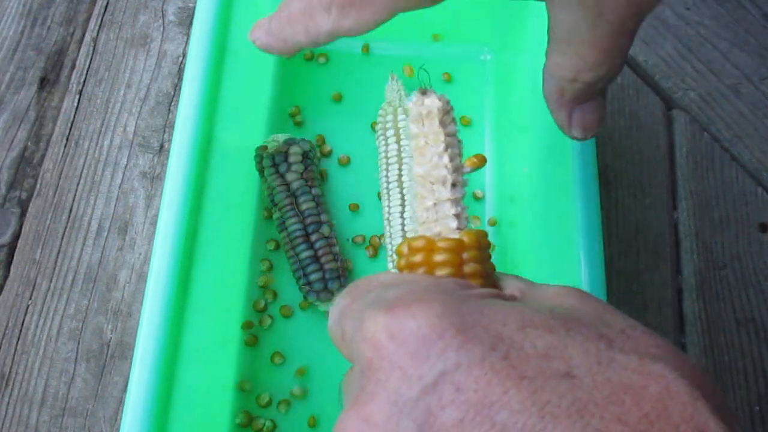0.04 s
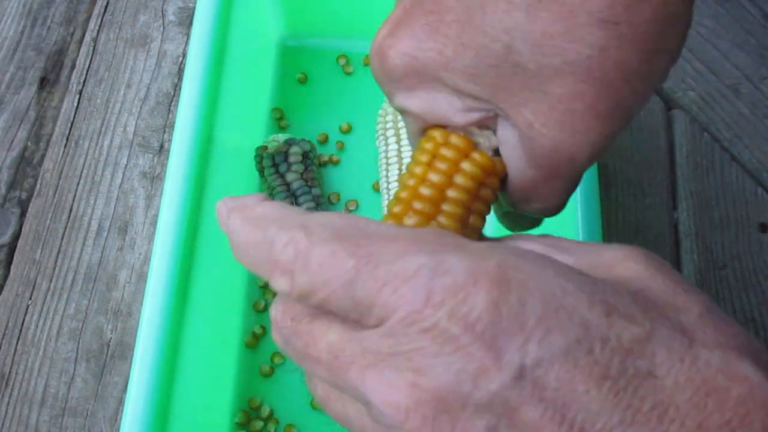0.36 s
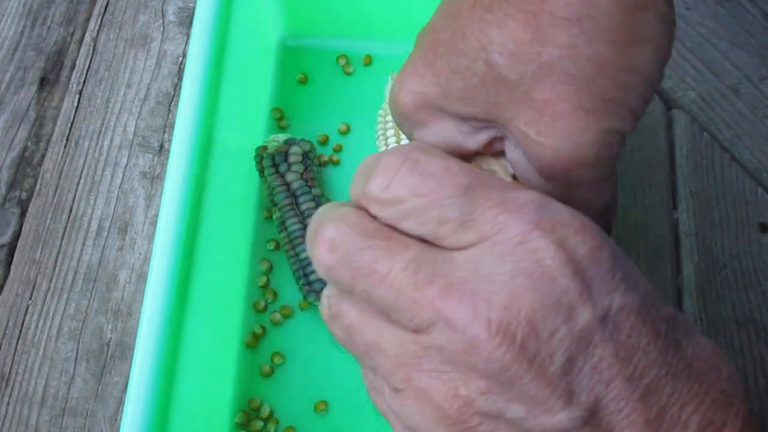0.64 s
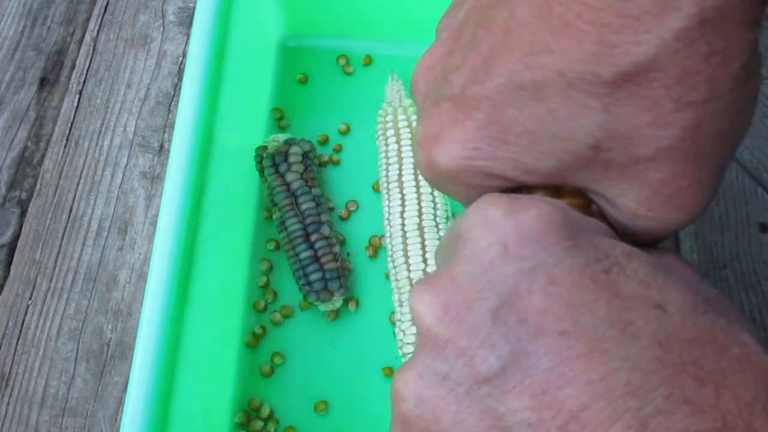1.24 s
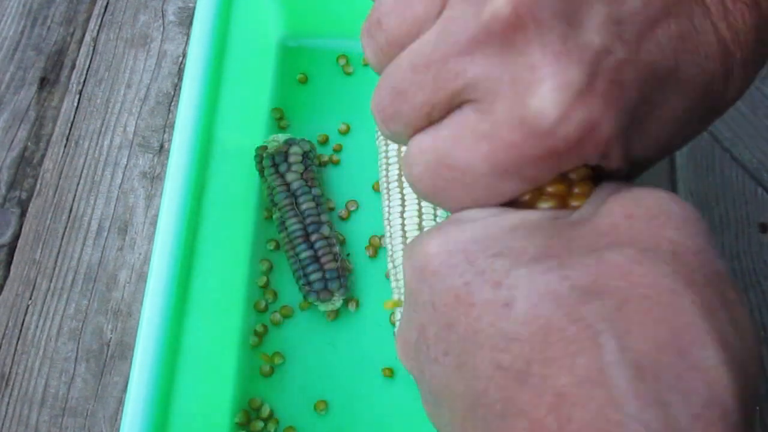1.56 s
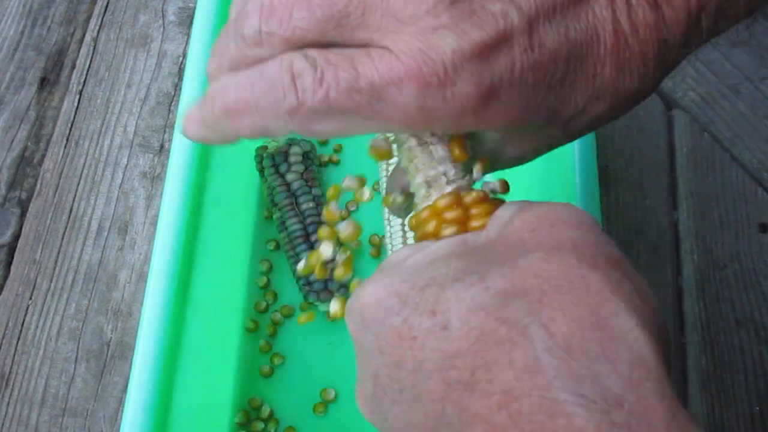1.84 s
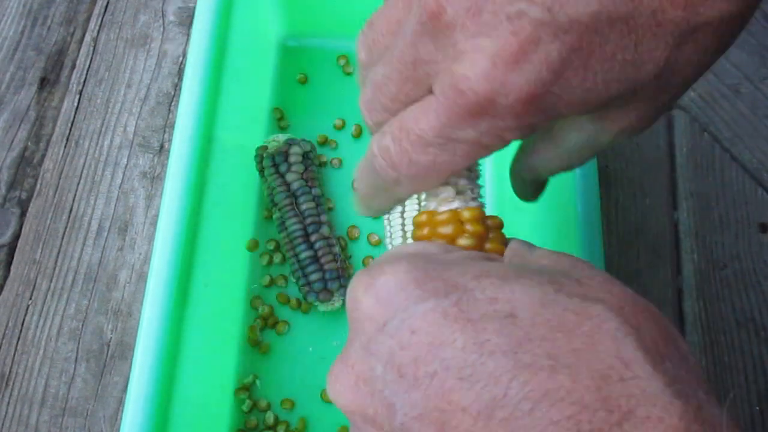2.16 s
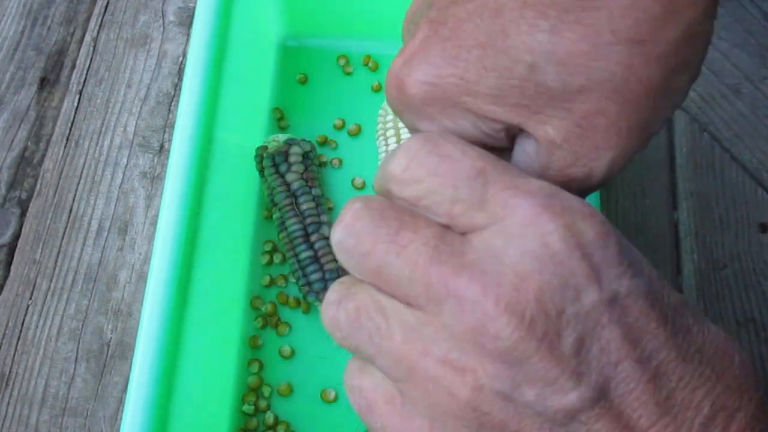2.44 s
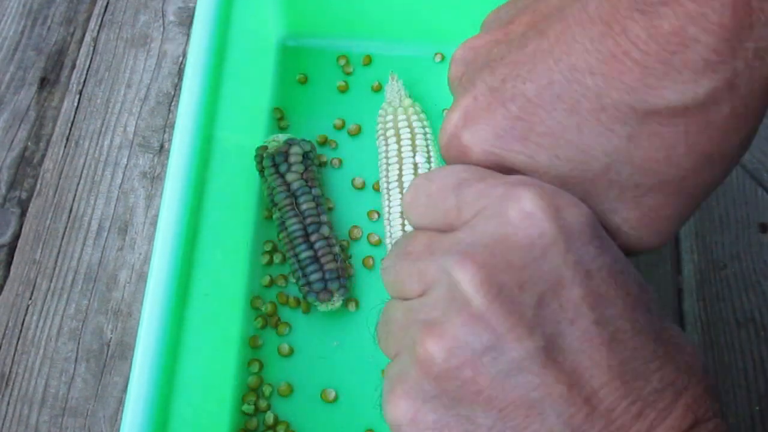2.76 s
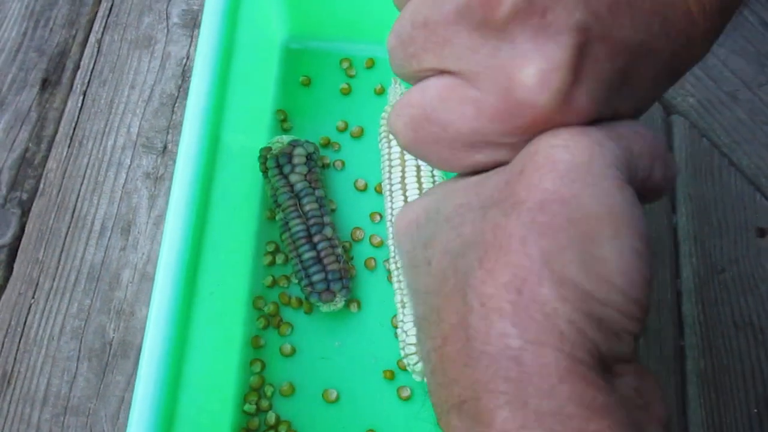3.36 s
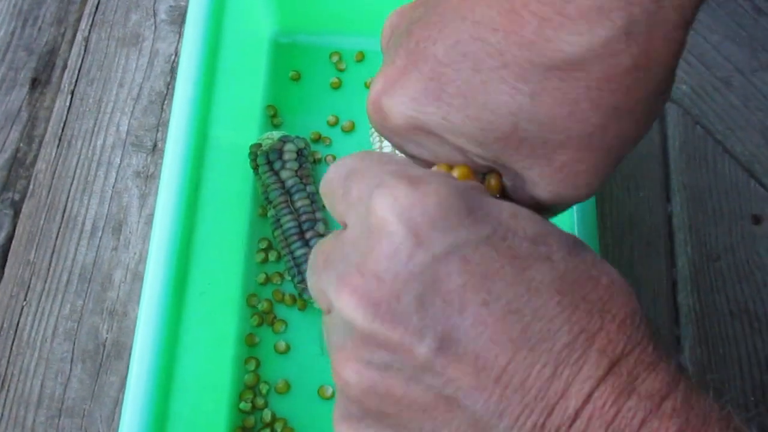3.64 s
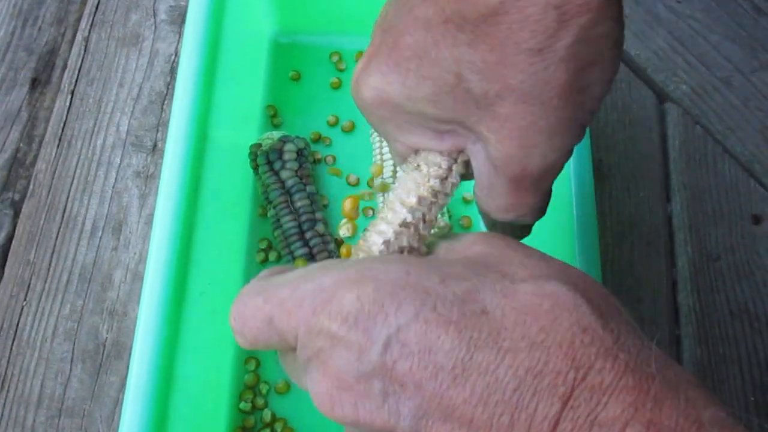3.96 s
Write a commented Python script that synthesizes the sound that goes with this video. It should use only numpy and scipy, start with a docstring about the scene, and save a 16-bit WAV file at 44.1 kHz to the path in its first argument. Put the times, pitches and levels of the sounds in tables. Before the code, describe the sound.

Dry corn kernels crackle and snap as hands twist them off a cob over a plastic tray. The close cracks come in three clusters, with small ticks and grinding between, over a faint distant outdoor rumble.

```python
"""Outdoors, above a plastic tray, hands twist dry kernels off a corn cob, heard from close by. Each kernel
snaps loose with a bright crack, a short woody ring and a low knock that the tray answers; late snaps also ring
the hollow cob. Between snaps, kernels tick and grind, skin slides and the grip bumps. A distant rush and rumble
go on behind."""
import sys
import numpy as np
from scipy import signal
from scipy.fft import rfft, irfft, next_fast_len
from scipy.io import wavfile
from scipy.ndimage import map_coordinates

SR = 44100
rng = np.random.default_rng(int(sys.argv[2]) if len(sys.argv) > 2 else 0)


def digitize_waveform(pressure):
    """Quantize a signal to 16-bit integers and store it at the path in sys.argv[1].

    Rows of a 2-D input are taken as channels; values are limited to [-1, 1].
    """
    field = np.atleast_2d(pressure).T
    bounded = np.clip(field, -1, 1)
    quanta = np.round(bounded * 32767).astype(np.int16)
    wavfile.write(sys.argv[1], SR, quanta)


N = 4 * SR
FRACTURE_T60_S = 0.00099  # sharp first instant of a contact


def amp(db):
    return 10 ** (np.asarray(db) / 20)


def unit_rms(x):
    return x / np.sqrt(np.mean(x ** 2) + 1e-20)


def curve(rows):
    """(s, value) points as one value per sample."""
    return np.interp(np.arange(N) / SR, *np.transpose(rows))


def coloured(x, spectrum):
    """x through a minimum-phase filter with the gain of the (Hz, dB) points."""
    size = 2 * next_fast_len(len(x))
    hz, db = np.transpose(spectrum)
    gain = amp(np.interp(np.log(np.fft.rfftfreq(size, 1 / SR) + 1), np.log(hz), db))
    cepstrum = irfft(np.log(gain), size)
    cepstrum[1:size // 2] *= 2
    cepstrum[size // 2 + 1:] = 0
    return irfft(rfft(x, size) * np.exp(rfft(cepstrum)), size)[:len(x)]


def decay(t, t60_s):
    """Exponential decay, silent before t = 0."""
    return (t >= 0) * np.exp(-np.log(1000) * np.abs(t) / t60_s)


def at_onset_db(x, db):
    """x scaled to an rms level over its first 6 ms."""
    onset = x[:round(0.006 * SR)]
    return amp(db) * x / np.sqrt(np.mean(onset ** 2) + 1e-20)


def add(out, start_s, x):
    start = max(round(start_s * SR), 0)
    out[start:start + len(x)] += x[:max(len(out) - start, 0)]


def burst(t, t60_s, fracture_db, echo_s=0.0038, rattle_db=4.5, rattle_per_s=570):
    """Noise with a sharp start, an echo off the tray floor and a rattling scatter between its walls."""
    flicker = np.interp(t * rattle_per_s, np.arange(len(t)), rng.standard_normal(len(t)))
    fracture = amp(fracture_db) * decay(t, FRACTURE_T60_S)
    echo = amp(-9.5) * decay(t - echo_s, t60_s)
    scatter = amp(-17 + rattle_db * np.clip(flicker, -2, 2)) * decay(t, t60_s=0.092)
    envelope = np.linalg.norm([decay(t, t60_s), fracture, echo, scatter], axis=0)  # powers add
    return envelope * rng.standard_normal(len(t))


def ring_modes(t, modes, spread_db=2, detune=0.015):
    """The decaying modes of a struck object, a little different at every blow."""
    out = np.zeros(len(t))
    for k, (hz, db, t60_s) in enumerate(modes):
        envelope = amp(db + rng.normal(0, spread_db)) * decay(t, t60_s)
        out += (-1) ** k * envelope * np.sin(2 * np.pi * hz * rng.normal(1, detune) * t)
    return out


# Kernel snaps. Each row: start in seconds, knock, body and crack levels in dB before trim, ring in Hz.
KERNEL_SNAPS = [(0.0125, -33.5, -26, -29, 5730), (0.0254, -33, -31, -28, 6140),
                (0.0498, -50, -23, -24, 1700), (0.0616, -36, -29.5, -27, 2050),
                (0.0692, -36.5, -26, -30, 1830), (0.08, -43, -27.5, -28, 3030),
                (0.0917, -35, -32, -30.5, 1640), (0.1306, -31.5, -21.5, -33, 7900),
                (0.135, -31.5, -28, -23.5, 6800), (0.1406, -29, -27, -29, 1940),
                (0.17, -51, -34, -32, 7450), (0.2067, -57, -37, -34.5, 7500), (0.2274, -36, -35, -35, 2520),
                (0.2722, -45, -39, -39.5, 1730), (0.2836, -46, -34, -41, 1720),
                (0.311, -55, -36, -36, 1870), (1.2815, -59, -38, -38.5, 6800),
                (1.3173, -62, -40, -39.5, 2360), (1.3452, -64, -37, -35.5, 2370),
                (1.4379, -49, -43, -34, 4450), (1.487, -54, -45, -42, 1150), (1.5194, -21, -18, -18, 1730),
                (1.5536, -42, -25, -24, 1780), (1.6421, -22, -19, -21.5, 2490),
                (1.6879, -34, -24.5, -32, 2430), (1.724, -44, -25.5, -26.5, 2940),
                (1.7326, -32, -29.5, -33.5, 1510), (1.745, -27, -19, -23, 1840),
                (1.8057, -56, -35, -42, 3920), (1.8533, -40, -31.5, -35, 4220),
                (1.8642, -42, -21, -25, 1400), (1.8876, -40, -29, -32, 2300),
                (1.8928, -35, -24.5, -24.5, 1920), (1.91, -42, -19.5, -31, 1730),
                (1.9179, -29, -23, -21.5, 5730), (1.9321, -27, -18.5, -21.5, 2290),
                (1.9401, -34, -19, -22, 7430), (1.947, -26, -30, -20.5, 5330),
                (1.9527, -47, -22.5, -26, 1780), (1.996, -29, -21.5, -22.5, 1850),
                (2.0006, -56, -31, -27, 4100), (2.0174, -30.5, -24.5, -31, 1910),
                (2.0291, -51, -30, -37, 2640), (2.1552, -47, -34, -35, 1510),
                (2.1652, -37, -31, -31.5, 3600), (2.2036, -32, -24.5, -26, 4080),
                (2.2283, -45, -31.5, -31, 9150), (2.2841, -56, -37, -37.5, 2380),
                (3.2473, -43, -33.5, -46, 2930), (3.3363, -39, -22.5, -22, 5580),
                (3.4356, -38, -30.5, -45.5, 1630), (3.4903, -42, -34, -33.5, 1600),
                (3.681, -32, -22, -21.5, 1865), (3.744, -27, -17, -23.5, 2600),
                (3.821, -45, -34, -41, 1350), (3.8278, -56, -35, -33, 5300), (3.8375, -52, -33, -32, 4140),
                (3.8451, -49, -30, -32.5, 4050), (3.8626, -53, -32, -36, 2100),
                (3.926, -33, -22, -24, 1410), (3.98, -40, -26.5, -23, 4160)]
# Spectra of the crack and of the cob's woody body. Each row: frequency in Hz, gain in dB.
CRACK_SPECTRUM = [(1500, -34.5), (3000, -11), (4300, 1.5), (6000, 0), (8200, 1), (10500, -1.5),
                  (14500, -2.5), (16000, -12)]
BODY_SPECTRUM = [(300, -41.5), (700, -8.5), (1300, -1), (1900, -2.5), (2900, -2), (3800, -6), (7000, -32.5)]
# Plastic tray modes. Each row: frequency in Hz, relative level in dB, T60 in seconds.
TRAY_MODES = [(282, 0.5, 0.07), (368, 0.5, 0.018), (482, 3, 0.039), (744.6, 5.5, 0.028), (932, -7, 0.1),
              (1149, 1, 0.032), (1326, -7, 0.079)]


def kernel_snaps(knock_trim_db=1, body_trim_db=-2.5, crack_trim_db=1.5, ring_width_hz=120):
    """A kernel breaks loose: bright crack, woody body, its own ring and the tray's low knock."""
    out, t = np.zeros(N), np.arange(SR // 10) / SR
    for start_s, knock_db, body_db, crack_db, ring_hz in KERNEL_SNAPS:
        crack = coloured(burst(t, t60_s=0.011, fracture_db=8), CRACK_SPECTRUM)
        body = coloured(burst(t, t60_s=0.012, fracture_db=7.5), BODY_SPECTRUM)
        blur_rad = np.cumsum(rng.standard_normal(len(t))) * np.sqrt(2 * np.pi * ring_width_hz / SR)
        ring = np.sin(2 * np.pi * ring_hz * t + blur_rad) * decay(t, t60_s=0.027)
        ring_db = body_db - 4 if ring_hz < 3500 else crack_db - 8
        knock = ring_modes(t, TRAY_MODES)
        add(out, start_s, at_onset_db(crack, crack_db + crack_trim_db))
        add(out, start_s, at_onset_db(body, body_db + body_trim_db))
        add(out, start_s, at_onset_db(ring, ring_db))
        add(out, start_s, at_onset_db(knock, knock_db + knock_trim_db))
    return out


# Kernel contacts. Each row: start in seconds, level in dB before trim, resonance in Hz.
KERNEL_TICKS = [(0.0205, -29.5, 6500), (0.0463, -37, 4500), (0.095, -33, 10000), (0.1065, -32, 5000),
                (0.1154, -32, 4500), (0.155, -35.5, 8000), (0.157, -35, 7000), (0.1666, -33, 6000),
                (0.1774, -34, 8000), (0.187, -35, 4000), (0.238, -40, 11000), (0.2528, -37, 10000),
                (0.3457, -45, 9300), (0.404, -47, 4850), (0.4238, -41, 2970), (0.55, -45.5, 3260),
                (1.2674, -44, 3700), (1.2737, -40, 6340), (1.351, -44, 12000), (1.377, -47, 6100),
                (1.409, -33.5, 7600), (1.5015, -42, 3800), (1.566, -44, 4670), (1.5964, -32.5, 6550),
                (1.7949, -38.5, 5750), (1.834, -40, 4000), (1.9277, -29, 8200), (1.9606, -33, 3000),
                (2.014, -30, 6000), (2.0373, -31, 10500), (2.044, -35, 5500), (2.0537, -29, 7000),
                (2.0607, -29, 6500), (2.0737, -33.5, 6000), (2.0904, -32.5, 6500), (2.1004, -36, 5000),
                (2.14, -43, 7000), (2.1484, -40, 5500), (2.2734, -37.5, 3280), (2.2889, -39, 4300),
                (2.323, -40, 3180), (2.33, -40, 11400), (2.343, -42, 4130), (2.3675, -47, 4170),
                (2.3894, -41.5, 4970), (2.4246, -46, 4320), (2.452, -48.5, 2880), (2.563, -44, 2530),
                (2.618, -51.5, 2680), (2.9465, -45.5, 3850), (2.968, -46.5, 5730), (3.0735, -47.5, 6900),
                (3.0923, -41.5, 5500), (3.0982, -40, 8700), (3.128, -42.5, 8500), (3.1627, -46, 4640),
                (3.3178, -43, 6240), (3.3338, -37, 6000), (3.4747, -46, 4400), (3.562, -45, 3700),
                (3.697, -34, 7040), (3.8726, -38, 4400), (3.9017, -39, 4120), (3.958, -31.5, 6840)]


def kernel_ticks(click_trim_db=1.5, body_trim_db=-10.5, width_oct=0.3):
    """Loosened kernels click together, each with one broad resonance and a little of the cob's body."""
    out, t = np.zeros(N), np.arange(SR // 20) / SR
    width = 2 ** width_oct
    fracture = amp(2) * decay(t, FRACTURE_T60_S)
    tail = amp(-22) * decay(t, t60_s=0.06)
    envelope = fracture + decay(t, t60_s=0.013) + tail
    for start_s, db, hz in KERNEL_TICKS:
        resonance = [(hz / 8, -30), (hz / width ** 2, -4), (hz, 0), (hz * width, -4), (hz * 4, -19)]
        click, body = envelope * rng.standard_normal((2, len(t)))
        add(out, start_s, at_onset_db(coloured(click, resonance), db + click_trim_db))
        add(out, start_s, at_onset_db(coloured(body, BODY_SPECTRUM), db + body_trim_db))
    return out


# Blows on the cob from the late kernel snaps. Each row: start in seconds, onset level in dB, most excited
# frequency in Hz.
COB_BLOWS = [(3.337, -31, 1790), (3.4352, -26.5, 1670), (3.6806, -24, 1140), (3.7446, -20.5, 1290),
             (3.837, -33.5, 1300), (3.86, -32.5, 1350), (3.926, -23, 1250)]
# Hollow cob modes. Each row: frequency in Hz, relative level in dB, T60 in seconds.
COB_MODES = [(1090, -8, 0.021), (1352, -1, 0.028), (1667, -5, 0.046), (1970, -2, 0.036), (2700, 1, 0.029)]


def cob_taps(attack_s=0.00063, fall_db_per_oct=18):
    """A blow rings the hollow cob; where it lands decides which modes ring most."""
    out, t = np.zeros(N), np.arange(SR // 10) / SR
    attack = 1 - np.exp(-t / attack_s)
    for start_s, db, favoured_hz in COB_BLOWS:
        excited = [(hz, mode_db - fall_db_per_oct * abs(np.log2(hz / favoured_hz)), t60_s)
                   for hz, mode_db, t60_s in COB_MODES]
        add(out, start_s, at_onset_db(ring_modes(t, excited) * attack, db))
    return out


# Grinding under the twist. Each row: time in seconds, level in dB.
GRIND_LEVELS = [(0, -26), (.07, -35.5), (.16, -33), (.2, -37), (.23, -37), (.29, -36), (.36, -41.5),
                (.43, -46.5), (.47, -54.5), (.62, -62.5), (1.25, -85), (1.29, -50.5), (1.48, -44),
                (1.55, -41.5), (1.62, -45.5), (1.7, -49), (1.82, -54), (1.88, -47), (1.925, -37),
                (1.95, -23), (1.985, -31), (2.05, -26), (2.12, -34.5), (2.21, -36.5), (2.3, -42),
                (2.4, -50.5), (2.5, -56), (2.7, -72.5), (2.92, -74), (2.95, -41.5), (3.04, -73), (3.1, -49),
                (3.28, -61), (3.5, -45.5), (3.65, -43), (3.8, -46.5), (3.85, -41), (3.9, -47), (4, -38)]
# Grain spectrum. Each row: frequency in Hz, gain in dB.
GRAIN_SPECTRUM = [(100, -30), (230, 0), (290, -4), (400, -9), (700, -3.5), (1300, 0.5), (1900, -0.5),
                  (3000, -3), (5000, -5), (8500, -10), (14000, -14), (16000, -35)]


def kernel_grinding(peak_grains_per_s=1400, spread_db=4.5, families=10):
    """Tiny fractures and contacts, denser under more force, in families that each ring differently."""
    out, t = np.zeros(N), np.arange(SR // 20) / SR
    level_db = curve(GRIND_LEVELS)
    density = np.sqrt(amp(level_db - level_db.max()))
    for _ in range(families):
        hits = rng.random(N) < peak_grains_per_s * density / families / SR
        strength = amp(spread_db * np.clip(rng.standard_normal(N), -2, 2)) / np.sqrt(density)
        grain = unit_rms(burst(t, t60_s=0.0051, fracture_db=2))
        out += signal.fftconvolve(hits * strength, grain)[:N]
    return amp(level_db) * unit_rms(coloured(out, GRAIN_SPECTRUM))


# Bumps of hand and cob. Each row: start in seconds, gain in dB, thud pitch in Hz.
GRIP_BUMPS = [(3.272, -33, 210), (3.281, -29.5, 98), (3.306, -34, 255), (3.4305, -21.5, 287),
              (3.447, -24, 108), (3.463, -21, 166), (3.512, -29.5, 178)]
# Spectrum of dragging skin. Each row: frequency in Hz, gain in dB.
RUB_SPECTRUM = [(50, -5.5), (280, -1.5), (450, -9), (2500, -33)]


def grip_bumps(attack_s=0.00068):
    """The grip changes: a dull thud, then a short drag of skin."""
    out, t = np.zeros(N), np.arange(SR // 5) / SR
    attack = 1 - np.exp(-t / attack_s)
    for start_s, db, hz in GRIP_BUMPS:
        thud = np.sin(2 * np.pi * hz * t) * decay(t, t60_s=0.052)
        friction = unit_rms(coloured(rng.standard_normal(len(t)), RUB_SPECTRUM))
        rub = amp(-11) * friction * decay(t, t60_s=0.071)
        add(out, start_s, amp(db) * (thud + rub) * attack)
    return out


# Skin sliding. Each row: time in seconds, level in dB.
SLIDE_LEVELS = [(0, -57), (.4, -67), (.48, -77), (.85, -73.5), (.9, -52.5), (.97, -52.5), (1.03, -74),
                (1.14, -59), (1.24, -66), (1.3, -53), (1.5, -52), (1.8, -76), (2, -34), (2.3, -59),
                (2.5, -75), (2.58, -59.5), (2.88, -71), (3.05, -62.5), (3.13, -47), (3.3, -59.5),
                (3.45, -62), (3.64, -49), (3.78, -66), (4, -52)]
# Skin hiss spectrum. Each row: frequency in Hz, gain in dB.
SKIN_SPECTRUM = [(500, -23), (2000, -16), (4500, 3), (8000, 4.5), (13000, 2.5), (16000, -7.5)]


def skin_slide():
    """Dry skin hisses as it slides over the cob."""
    hiss = unit_rms(coloured(rng.standard_normal(N), SKIN_SPECTRUM))
    return amp(curve(SLIDE_LEVELS)) * hiss


# Outdoor background. Each row: time in seconds, rush level in dB, rumble level in dB.
OUTDOOR_LEVELS = [(0, -41.5, -45), (.6, -42.5, -43.5), (1.1, -40, -43.5), (1.5, -39.5, -40.5),
                  (1.56, -43.5, -48.5), (2.4, -47.5, -52.5), (2.8, -47.5, -50), (3.2, -45.5, -47.5),
                  (3.55, -43.5, -44.5), (4, -43, -48)]
# Spectra of the mid rush and low rumble. Each row: frequency in Hz, gain in dB.
RUSH_SPECTRUM = [(100, -15.5), (300, -11), (420, -7.5), (600, -4), (720, 2), (920, 0), (1400, -5),
                 (2400, -14.5), (4200, -30.5), (8000, -42), (16000, -56)]
RUMBLE_SPECTRUM = [(20, -25), (45, -4.5), (65, -1.5), (110, 5), (160, -3.5), (220, -1), (320, -20),
                   (800, -48)]


def outdoors(drone_hz=65.3, drift_rad=0.9, drift_per_s=6):
    """Distant rush and rumble with a wavering low drone."""
    t = np.arange(N) / SR
    levels = np.array(OUTDOOR_LEVELS)
    rush_db, rumble_db = curve(levels[:, [0, 1]]), curve(levels[:, [0, 2]])
    rush = unit_rms(coloured(rng.standard_normal(N), RUSH_SPECTRUM))
    rumble = unit_rms(coloured(rng.standard_normal(N), RUMBLE_SPECTRUM))
    drift = map_coordinates(rng.standard_normal(N // 100), [t * drift_per_s])
    drone = unit_rms(np.sin(2 * np.pi * drone_hz * t + drift_rad * drift))
    return amp(rush_db) * rush + amp(rumble_db) * (rumble + amp(-5.5) * drone)


def scene():
    """All sources summed to mono."""
    shelling = kernel_snaps() + kernel_ticks() + cob_taps() + kernel_grinding()
    hands = skin_slide() + grip_bumps()
    return (shelling + hands + outdoors())[None]


def record(dry):
    """Clip at full scale, then cut everything above 16 kHz."""
    size = next_fast_len(N + SR // 2)
    passband = np.fft.rfftfreq(size, 1 / SR) < 16000
    clipped = np.clip(dry, -1, 1)
    return irfft(rfft(clipped, size) * passband, size)[..., :N]


dry = scene()
out = record(dry)
digitize_waveform(out)
```